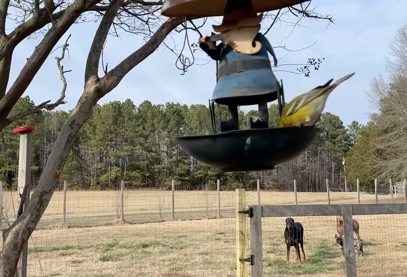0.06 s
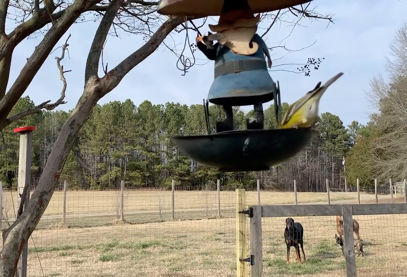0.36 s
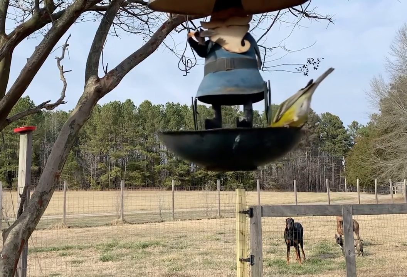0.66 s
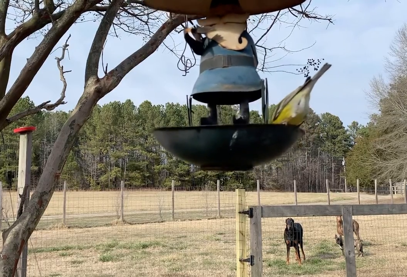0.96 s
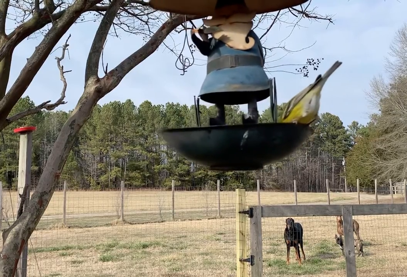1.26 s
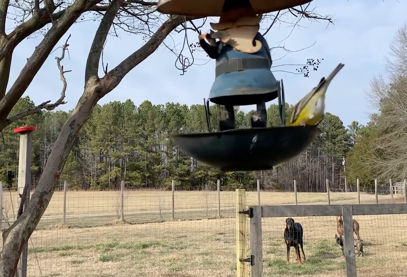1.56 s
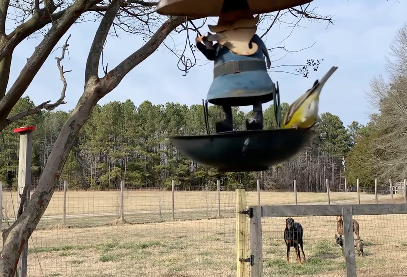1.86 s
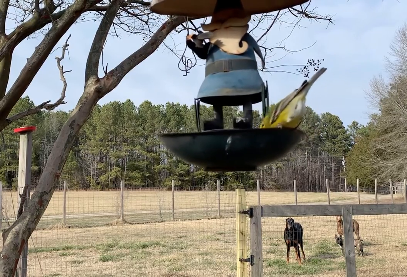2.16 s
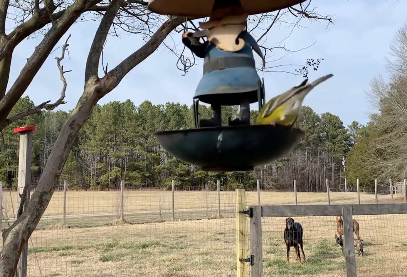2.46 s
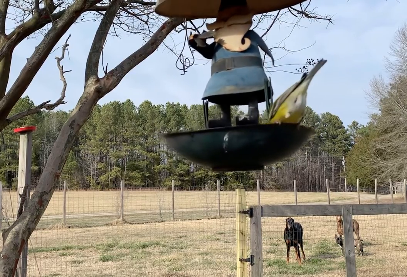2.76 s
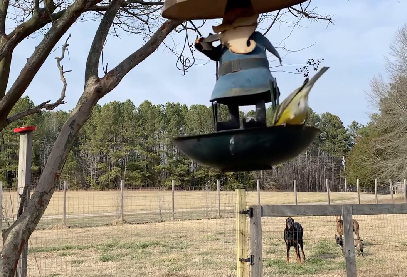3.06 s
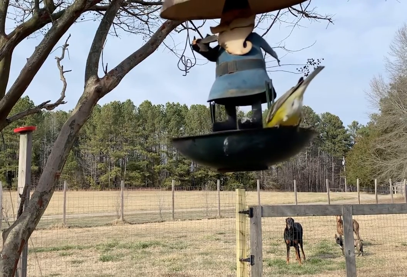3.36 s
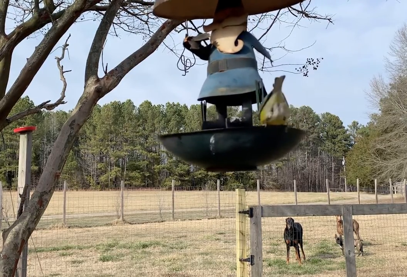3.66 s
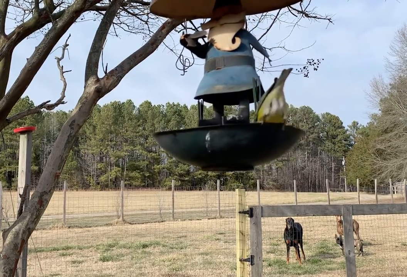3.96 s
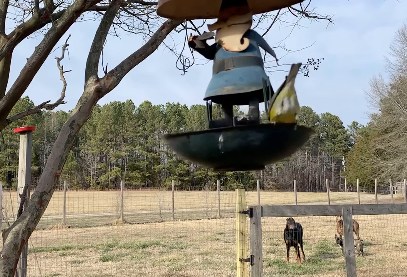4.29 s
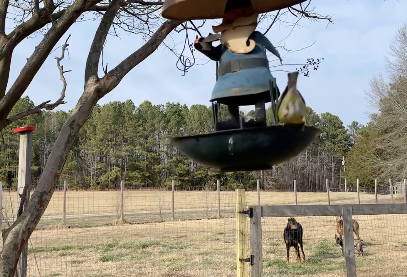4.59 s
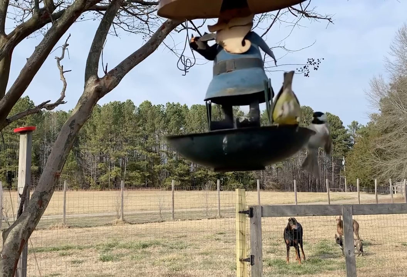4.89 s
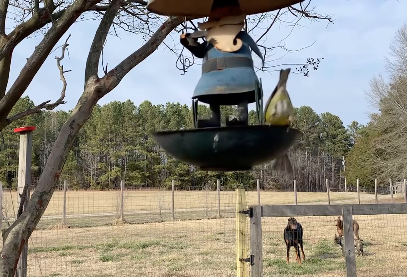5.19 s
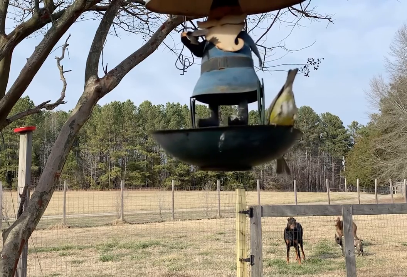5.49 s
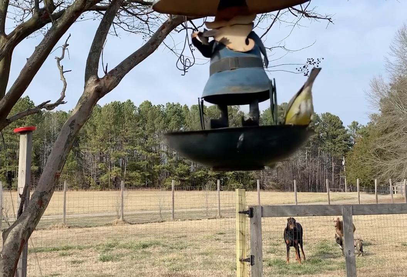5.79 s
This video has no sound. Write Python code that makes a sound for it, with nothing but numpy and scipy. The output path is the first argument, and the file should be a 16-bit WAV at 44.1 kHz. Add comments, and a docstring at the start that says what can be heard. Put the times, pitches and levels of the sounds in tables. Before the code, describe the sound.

A small bird feeds close by in a hanging metal dish, making light beak clicks and cracking seed husks, with one sharp crack near the middle standing out. Later come a few soft hollow knocks and brief scratchy scrapes. Faint, short chirps and thin whistles come from trees to the right throughout. A breeze rumbles on the microphone in the open yard, with clusters of dull thumps before and after the loud crack.

```python
"""A songbird at a metal feeder

A small bird feeds in a hanging metal dish in an open yard. It cracks seeds and scrapes about,
and the dish rings faintly. Finches in the trees chirp with both sides of their voice box at once,
and other birds add thin whistles. A breeze rumbles on the microphones and dull thumps shake them.
There are a few hollow knocks, and machines hum and whine far away."""
import sys
import numpy as np
from scipy import signal
from scipy.fft import rfft, irfft
from scipy.io import wavfile

SR = 44100
rng = np.random.default_rng(int(sys.argv[2]) if len(sys.argv) > 2 else 0)


def put_to_file(sound):
    """Save the sound as 16-bit audio at rate SR, in the file named by the first command-line argument."""
    columns = np.atleast_2d(sound).T  # one column per channel
    safe = np.clip(columns, -1, 1)
    whole_steps = np.round(safe * 32767)
    wavfile.write(sys.argv[1], SR, whole_steps.astype(np.int16))


N = 266275
T = np.arange(N) / SR

# beak clicks on seed and dish; the loud ones crack a husk: (time [s], level [dB])
PECKS = [(0.8814, -60), (1.517, -48), (1.5242, -48), (1.565, -54), (1.6392, -33.5), (1.6755, -60),
         (1.69, -55.5), (1.7262, -54), (1.7441, -51.5), (1.9635, -43.5), (2.5732, -59.5), (2.8894, -20.5),
         (3.9055, -49.5), (3.9622, -56.5), (4.0098, -51)]
# scraping strokes: (time [s], length [s], level [dB], share of claw on metal rather than seed [0-1])
SCRAPES = [(3.456, 0.073, -62, 0.2), (4.9, 0.012, -50.5, 1), (4.911, 0.018, -47, 1),
           (4.944, 0.012, -47, 0.81), (5.034, 0.029, -63.5, 0.92), (5.123, 0.069, -69.5, 0.95),
           (5.995, 0.033, -48.5, 0.85), (6.028, 0.024, -48, 0.14)]
# the tones the dish rings with: (frequency [Hz], level [dB], time to fade by 60 dB [s])
DISH_TONES = [(2078, -11, .1), (3187, -9, .1), (4538, -4, .14), (5770, 0, .085), (6105, -5, .08),
              (6835, -7, .08), (8027, -7, .12), (8300, 2, .05), (9070, -3, .07)]
# tone colours of the cracks, scrapes and hiss, each with a narrow treble gap near 11.5 kHz
# that is not part of the source: (frequency [Hz], level [dB])
CRACK_COLOUR = [(1400, -25), (3000, -23.5), (4100, -18.5), (4900, -9.5), (5900, 5), (8400, 6.5),
                (10500, -3), (11700, -22), (13500, -15.5)]
SCRAPE_COLOUR = [(3600, -22), (4600, 11), (5300, -39), (6200, -1), (7500, 4), (8200, 20), (10500, 14.5),
                 (11700, -4.5), (13000, 3)]
HISS_COLOUR = [(1500, -3.5), (2600, -5.5), (3600, -9), (7200, -10.5), (9500, -4.5), (11300, -18),
               (15000, -9.5)]
# tone colour of shifting seed: (frequency [Hz], level [dB])
SEED_COLOUR = [(1000, 3), (4500, 9), (6000, 23), (9000, 20), (15000, -21)]
# finch chirps: (time [s], length [s], top pitch [Hz], starting pitch [share of the top],
# upper voice against the main voice [dB], level [dB])
CHIRPS = [(0.148, 0.057, 2925, 1, -3, -68), (0.416, 0.068, 3940, 0.8, 3, -78.5),
          (1.175, 0.037, 3140, 0.96, -8, -73.5), (1.545, 0.065, 3550, 0.77, -13, -71),
          (1.793, 0.06, 3747, 0.76, -9, -54.5), (2.898, 0.059, 3645, 0.78, -3, -59),
          (3.594, 0.076, 3170, 0.89, -13, -69), (3.843, 0.067, 3725, 0.8, -4.5, -68),
          (4.334, 0.051, 3850, .9, -10, -73), (4.635, 0.054, 3650, 0.82, -7.5, -67.5),
          (5.039, 0.06, 3580, 0.76, -2, -65.5), (5.312, 0.065, 3030, 0.96, -21, -66),
          (5.671, 0.057, 3197, 0.91, -5.5, -68)]
# plain one-voiced whistles, mostly from other birds, the one at 2.015 s from a finch: (time [s], length [s],
# start pitch [Hz], end pitch [Hz], level [dB])
WHISTLES = [(0.0, 0.066, 4780, 4600, -86.5), (0.155, 0.058, 2600, 2100, -66),
            (0.202, 0.053, 7280, 7050, -67.5), (0.325, 0.032, 3690, 4300, -78),
            (0.375, 0.046, 2790, 2850, -71), (0.464, 0.058, 2377, 2420, -67.5),
            (0.478, 0.034, 4150, 4090, -71.5), (0.588, 0.069, 4260, 2820, -76.5),
            (0.715, 0.064, 3980, 2420, -80), (1.219, 0.027, 7400, 7330, -69),
            (2.015, 0.09, 3550, 3344, -67), (3.032, 0.045, 7450, 7420, -69),
            (3.151, 0.072, 2880, 2730, -79), (3.239, 0.068, 6980, 7020, -72.5),
            (3.86, 0.056, 2190, 2720, -71.5), (4.288, 0.06, 3210, 2190, -71),
            (4.379, 0.017, 3080, 2966, -62.5), (4.449, 0.19, 3215, 2537, -80.5),
            (4.692, 0.03, 2680, 2810, -71), (4.821, 0.11, 1343, 1463, -76),
            (5.108, 0.063, 2696, 2636, -69.5), (5.248, 0.04, 7450, 7270, -74.5),
            (5.738, 0.031, 7400, 7350, -75.5)]
# jolts to the microphones: (time of the peak [s], length [s], pitch [Hz], level [dB])
THUMPS = [(0.928, 0.023, 78.5, -29), (1.558, 0.019, 65, -31.5), (1.833, 0.012, 75, -33.5),
          (1.846, 0.0079, 166, -30.5), (1.864, 0.0066, 170, -39.5), (1.879, 0.0089, 125, -35.5),
          (1.903, 0.005, 195, -35.5), (4.42, 0.0038, 195, -28.5), (4.429, 0.006, 165, -25),
          (4.44, 0.016, 80, -20), (4.655, 0.023, 74.4, -32), (4.733, 0.026, 111, -32)]
# light hollow knocks: (time [s], level [dB])
KNOCKS = [(3.908, -49.5), (4.589, -46.5), (5.012, -54)]
# tone colours of a thump's puff of air and of a knock: (frequency [Hz], level [dB])
PUFF_COLOUR = [(60, -25.5), (160, 17.5), (330, -5), (520, -12), (1000, -40.5), (4000, -72.5)]
KNOCK_COLOUR = [(150, 0), (450, 9.5), (900, -3.5), (1600, -18.5), (3000, -27), (8000, -54)]
# a far machine whines twice: (start [s], end [s], level [dB])
WHINES = [(0.05, 0.287, -78), (5.462, 5.984, -81.5)]
# the two tones in its whine: (frequency [Hz], level [dB])
WHINE_TONES = [(1040, 1), (2600, -4.5)]
# background rumble and roar levels, which dip after the big thumps and then recover:
# (time [s], level [dB])
BACKGROUND_RUMBLE = [(0.0, -57.5), (0.5, -55.5), (0.76, -63), (1.04, -60.5), (1.11, -47), (1.45, -55),
                     (1.88, -42.5), (2.07, -54), (3.05, -51), (3.9, -54.5), (5.5, -51), (6.04, -54.5)]
BACKGROUND_ROAR = [(0.0, -82), (1.06, -79), (1.1, -73), (1.73, -74.5), (1.92, -81), (2.52, -75.5),
                   (4.32, -74), (4.57, -82), (5.47, -80), (6.04, -71.5)]
# tone colours of the wind and the far roar: (frequency [Hz], level [dB])
WIND_COLOUR = [(18, -20.5), (42, -1.5), (59, 5.5), (134, -11), (177, -18), (216, -21), (330, -40.5),
               (430, -58), (730, -120)]
ROAR_COLOUR = [(150, -32.5), (250, -3.5), (985, -14.5), (1060, -23), (1180, -22), (1700, -47.5),
               (2210, -66.5), (3740, -120)]
# how alike the air sounds on the left and right: (frequency [Hz], likeness [0-1])
AIR_LIKENESS = [(200, 1), (330, 1), (900, 0.1), (8500, .4)]
# how far the left microphone opening runs ahead of the right: (frequency [Hz], phase [rad])
PHASE_LEAD = [(4500, 0), (7400, 1.95), (8500, .5), (10000, -0.84), (12500, 2.4)]

NEAR_BIRD_DB = -53  # the further a call's level falls below this, the more distant it sounds


def pecks(snap_db=10, crackle_db=-21, crackle_s=.002, clatter_db=1, tail_db=-15, ring_db=-41):
    """A husk gives way with one snap in a tiny crackle, which echoes in the dish and makes it ring."""
    force, size = np.zeros(N), int(crackle_s * SR)
    for time, db in PECKS:
        crack = from_db(crackle_db) * rng.standard_normal(size) * np.hanning(size)
        crack[size // 2] += 1  # the snap itself
        cutoff_hz = 3900 * from_db(-0.49 * db)  # harder cracks are duller
        crack = low_pass(crack / np.linalg.norm(crack), cutoff_hz)
        add(force, time, from_db(db + snap_db) * crack)
    snap = colour(force, CRACK_COLOUR)
    clatter = from_db(clatter_db) * echoes(snap, fade_s=0.036)
    tail = from_db(tail_db) * echoes(snap, fade_s=0.19)
    return snap + clatter + tail + from_db(ring_db) * dish_ring(snap)


def scrapes(slips_per_s=2000, ring_db=-40.5, echo_db=-4):
    """Each stroke is many tiny slips of claws on metal and of seeds shifting."""
    on_metal, on_seed = np.zeros(N), np.zeros(N)
    for time, length, db, metal_share in SCRAPES:
        size = int(length * SR)
        slips = rng.standard_normal(size) * (rng.random(size) < slips_per_s / SR)
        envelope = signal.windows.tukey(size, .4) * np.linspace(1, .5, size)
        stroke = from_db(db) * unit_level(slips) * envelope
        add(on_metal, time, np.sqrt(metal_share) * stroke)
        add(on_seed, time, np.sqrt(1 - metal_share) * stroke)
    direct = colour(on_metal, SCRAPE_COLOUR) + colour(on_seed, SEED_COLOUR)
    ring = from_db(ring_db) * dish_ring(on_metal)
    return direct + from_db(echo_db) * echoes(direct, fade_s=0.12) + ring


def dish_ring(force):
    """Struck metal rings with its own set of tones, each dying away at its own speed."""
    ring = np.zeros(N)
    for hz, db, fade_s in DISH_TONES:
        decay, angle = from_db(-60 / (fade_s * SR)), 2 * np.pi * hz / SR  # both per sample
        feedback = [1, -2 * decay * np.cos(angle), decay * decay]
        ring += from_db(db) * signal.lfilter([0, np.sin(angle)], feedback, force + 1e-18)
    return ring


def finch_chirps(gap_hz=660, lower_db=-23, swell_db=6):
    """The two sides of a finch's voice box sing two pitches, which mix into a faint third below."""
    for time, length, top_hz, start_share, upper_db, db in CHIRPS:
        hz = pitch_arch(length, top_hz, start_share)
        waver = .0135 * (1 + (NEAR_BIRD_DB - db) / 20)  # far birds sound rougher
        upper = from_db(upper_db) * bird_voice(hz + gap_hz, waver)
        lower = from_db(lower_db) * bird_voice(hz - gap_hz, waver)
        swell = from_db(swell_db * np.linspace(-.5, .5, len(hz)))
        yield time, db, swell * (bird_voice(hz, waver) + upper + lower)


def pitch_arch(length, top_hz, start_share, end_share=.79, top_at=0.48):
    """A chirp's pitch climbs to its top about halfway through, then bends down."""
    progress = np.linspace(0, 1, int(length * SR))
    rise = start_share + (1 - start_share) * np.sin(np.pi / 2 * progress / top_at)
    fall = 1 - (1 - end_share) * np.sin(np.pi / 2 * (progress - top_at) / (1 - top_at))
    return top_hz * np.where(progress < top_at, rise, fall)


def plain_whistles(waver=0.027):
    """Plain notes, mostly from other birds, sung with one quavering voice that glides up or down."""
    for time, length, start_hz, end_hz, db in WHISTLES:
        yield time, db, bird_voice(np.geomspace(start_hz, end_hz, int(length * SR)), waver)


def bird_voice(hz, waver, flutter_db=3.0):
    """One side of a voice box makes an almost pure tone, which flutters as it passes through trees."""
    size = len(hz)
    flutter = unit_level(from_db(flutter_db * wobble(160, size)))
    unsteady_hz = hz * (1 + waver * wobble(460, size))
    phase = 2 * np.pi * np.cumsum(unsteady_hz) / SR
    return np.hanning(size) ** 0.26 * flutter * np.sin(phase)


def through_trees(calls, echo_db, fade_s, lag_ms):
    """Calls arrive directly and as echoes off the trees; fainter birds are further off and echo more."""
    direct, scattered = np.zeros(N), np.zeros(N)
    for time, db, call in calls:
        echo_gain = from_db(echo_db + 0.51 * (NEAR_BIRD_DB - db))
        gain = from_db(db) / np.hypot(1, echo_gain)  # the two paths share the call's power
        add(direct, time, gain * call)
        add(scattered, time, gain * echo_gain * call)
    return from_right(direct, lag_ms) + echoes(scattered, fade_s)


def thumps(pitch_sag=0.51, left_lead_ms=0.8):
    """Each jolt to the microphones is a short low throb that sinks in pitch, with a puff of air."""
    out, puff = np.zeros((2, N)), open_air(PUFF_COLOUR)
    clock = np.array([T + left_lead_ms / 1000, T])  # a jolt reaches the left side first
    for time, length, hz, db in THUMPS:
        from_peak = np.clip((clock - time) / length, -4, 4)
        cycles = hz * length * (1 - np.exp(-pitch_sag * from_peak)) / pitch_sag
        throb = np.cos(2 * np.pi * cycles)
        puff_db = -14.5 + 12.5 * np.log2(hz / 107.4)  # higher thumps hold more rushing air
        out += from_db(db) * np.exp(-2 * from_peak ** 2) * (throb + from_db(puff_db) * puff)
    return out


def knocks(force_db=15, rattle_db=-4):
    """Soft, hollow taps that die away at once."""
    force = np.zeros(N)
    for time, db in KNOCKS:
        add(force, time, from_db([db + force_db]))
    tap = colour(force, KNOCK_COLOUR)
    return tap + from_db(rattle_db) * echoes(tap, fade_s=0.034)


def far_machines():
    """One distant machine whines twice, and another hums in between."""
    whine = np.zeros((2, N))
    for side in whine:  # the whine takes its own path to each microphone
        for start, end, db in WHINES:
            for hz, tone_db in WHINE_TONES:
                side += far_tone(start, end, hz, db + tone_db, drift_per_khz=1.2)
    hum = far_tone(start=2.32, end=4.353, hz=176.7, db=-65, drift_per_khz=1.4)
    return whine + hum


def far_tone(start, end, hz, db, drift_per_khz, waver_db=2.0, fade_s=0.22):
    """A tone fades in and out; moving air makes it waver, and blurs it more the higher it is."""
    fade = np.clip(np.minimum(T - start, end - T) / fade_s + .5, 0, 1)
    gain = from_db(db + waver_db * wobble(12))
    phase_drift = drift_per_khz * hz / 1000 * wobble(12)
    return np.sqrt(2) * fade * gain * np.sin(2 * np.pi * hz * T + phase_drift)


def air(rumble_boost_db=3, roar_boost_db=4, hiss_db=-80.5, swirl_db=3.0):
    """Swirling wind rumbles on the microphones, over the countryside's far roar and a fine hiss."""
    rumble_db = np.interp(T, *np.transpose(BACKGROUND_RUMBLE)) + rumble_boost_db
    roar_db = np.interp(T, *np.transpose(BACKGROUND_ROAR)) + roar_boost_db
    rumble = from_db(rumble_db + swirl_db * wobble(7.5)) * open_air(WIND_COLOUR)
    roar = from_db(roar_db) * open_air(ROAR_COLOUR)
    return rumble + roar + from_db(hiss_db) * open_air(HISS_COLOUR)


def open_air(spectrum):
    """Stereo noise of a given tone colour: the same on both sides in the bass, less alike higher up."""
    hz = np.fft.rfftfreq(N, 1 / SR)
    likeness, gains = at_hz(AIR_LIKENESS, hz), from_db(at_hz(spectrum, hz))
    first, second = (unit_level(filter_by(rng.standard_normal(N), gains)) for _ in range(2))
    shared = filter_by(first, np.sqrt(1 + likeness))
    opposite = filter_by(second, np.sqrt(1 - likeness))
    return np.array([shared + opposite, shared - opposite]) / np.std(shared)


def echoes(x, fade_s):
    """Countless small reflections, different at each microphone, that fall by 60 dB in fade_s."""
    fall_db = 60 * T[:SR] / fade_s
    build_up = 1 - np.exp(-fall_db)
    tails = rng.standard_normal((2, SR)) * from_db(-fall_db) * build_up
    return np.array([signal.fftconvolve(x, tail / np.linalg.norm(tail))[:N] for tail in tails])


def from_right(x, lag_ms):
    """Sound from the right reaches the left microphone a little later."""
    delay = np.exp(-2j * np.pi * np.fft.rfftfreq(N, 1 / SR) * lag_ms / 1000)
    return np.array([filter_by(x, delay), x])


def colour(x, spectrum, size=1024):
    """Give a sound a tone colour, with a filter that leaves the power of white noise unchanged."""
    gains = from_db(at_hz(spectrum, np.fft.rfftfreq(size, 1 / SR)))
    cepstrum = irfft(np.log(gains))
    cepstrum[size // 2:] = 0  # so nothing sounds before the hit that causes it
    cepstrum[0] = 0
    response = irfft(np.exp(2 * rfft(cepstrum)))
    return signal.fftconvolve(x, response / np.linalg.norm(response))[:N]


def filter_by(x, gains):
    """Multiply each frequency in a sound by its own gain."""
    return irfft(rfft(x) * gains, N)


def low_pass(x, hz):
    """Soften everything above a frequency."""
    sections = signal.butter(2, np.clip(hz, 10, .45 * SR), "low", fs=SR, output="sos")
    return signal.sosfilt(sections, x + 1e-18)


def wobble(hz, size=N):
    """A smooth random wiggle, up to about hz times a second."""
    return unit_level(low_pass(rng.standard_normal(size), hz))


def at_hz(points, hz):
    """Read between the rows of a table, with octaves evenly spaced."""
    frequencies, values = np.transpose(points)
    return np.interp(np.log(np.maximum(hz, 1)), np.log(frequencies), values)


def add(track, time, sound):
    """Mix a sound into a track at a time in seconds."""
    start = max(0, round(time * SR))
    track[start:start + len(sound)] += sound[:max(0, N - start)]


def from_db(db):
    """Turn decibels into a gain."""
    return 10 ** (np.asarray(db) / 20)


def unit_level(x):
    """Scale a signal to an average power of 1."""
    return x / np.sqrt(np.mean(x ** 2) + 1e-20)


def scene():
    """The feeder close in front, birds in the trees to the right, and the air all round."""
    finches = through_trees(finch_chirps(), echo_db=-8.5, fade_s=0.17, lag_ms=.36)
    finches *= from_db([[-1.5], [2]])  # louder on the right
    whistles = through_trees(plain_whistles(), echo_db=-11.5, fade_s=0.21, lag_ms=0.766)
    return pecks() + scrapes() + finches + whistles + thumps() + knocks() + far_machines() + air()


def record(dry):
    """The two microphone openings put the treble out of step, and the very top is cut off steeply."""
    lead = at_hz(PHASE_LEAD, np.fft.rfftfreq(N, 1 / SR))
    shifted = filter_by(dry, np.exp(.5j * np.array([lead, -lead])))
    cutoff_hz = 15200
    return signal.sosfilt(signal.ellip(10, .1, 70, cutoff_hz, fs=SR, output="sos"), shifted)


dry = scene()
out = record(dry)
put_to_file(out)
```